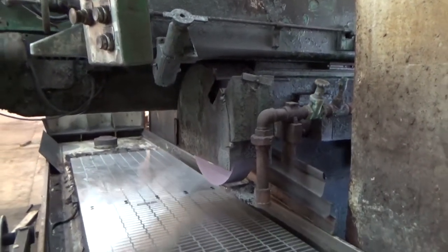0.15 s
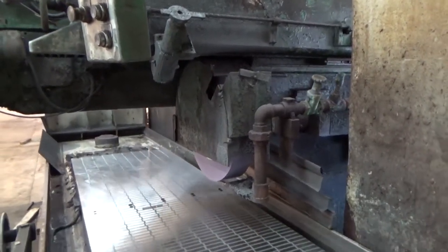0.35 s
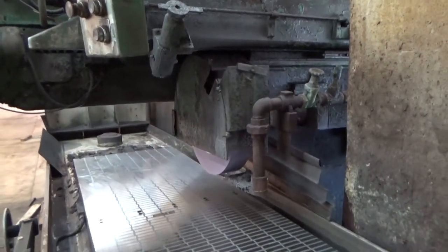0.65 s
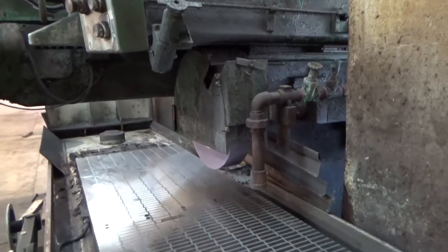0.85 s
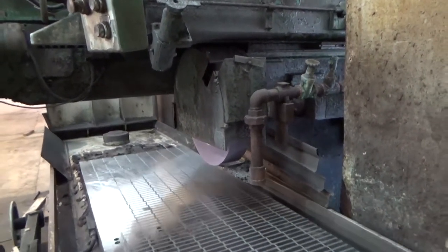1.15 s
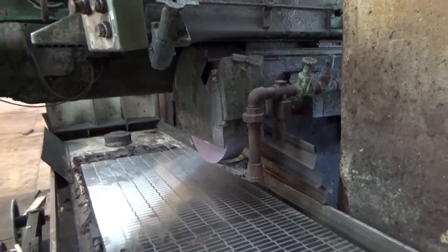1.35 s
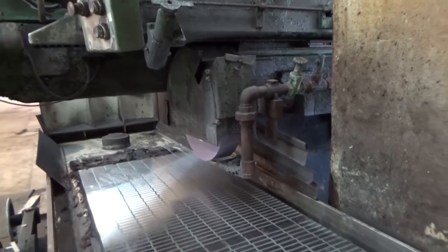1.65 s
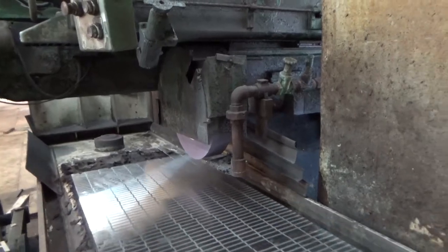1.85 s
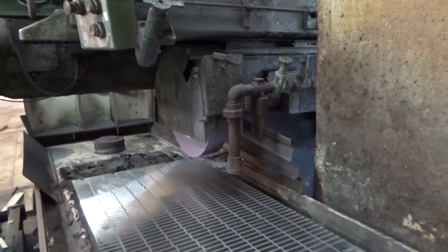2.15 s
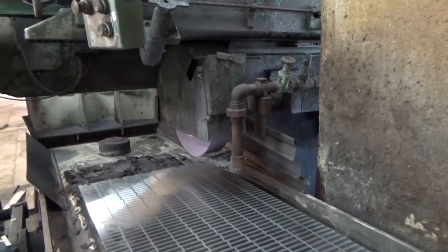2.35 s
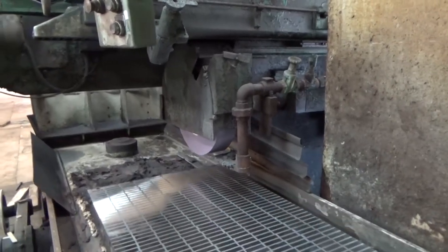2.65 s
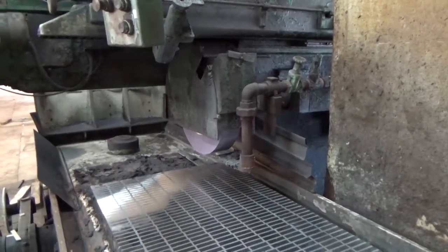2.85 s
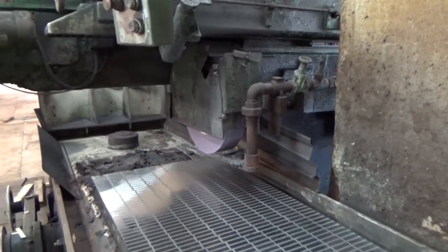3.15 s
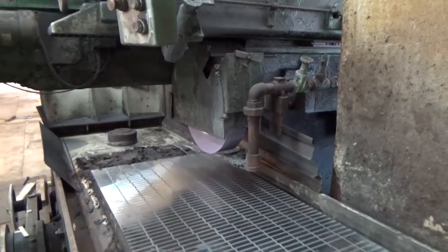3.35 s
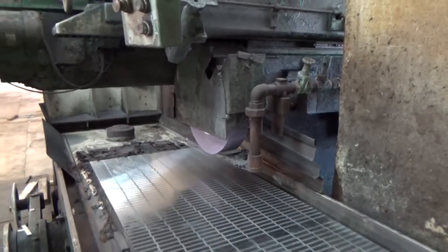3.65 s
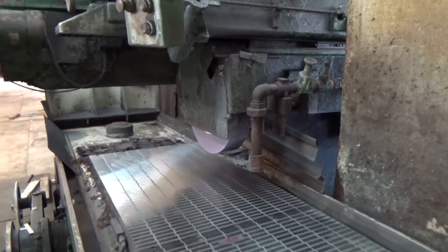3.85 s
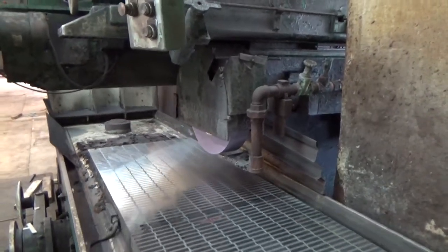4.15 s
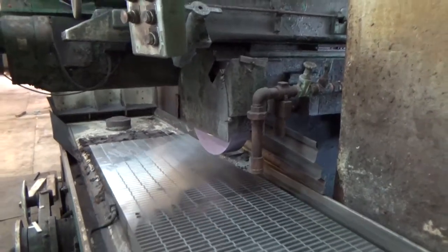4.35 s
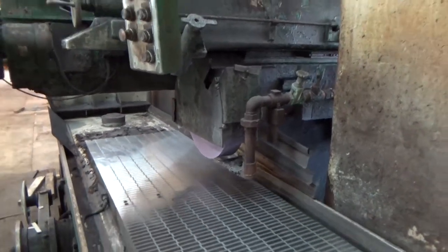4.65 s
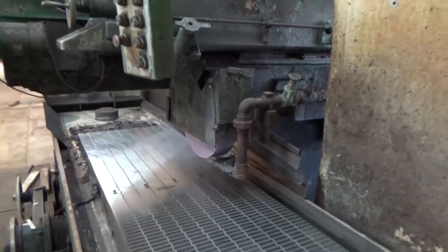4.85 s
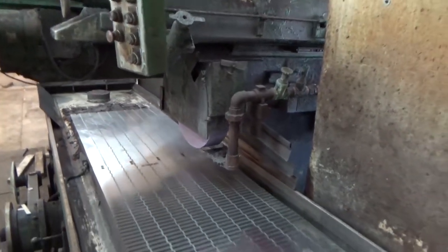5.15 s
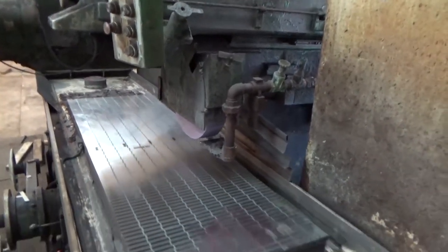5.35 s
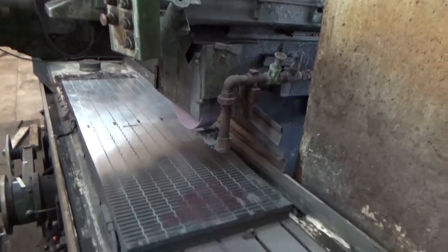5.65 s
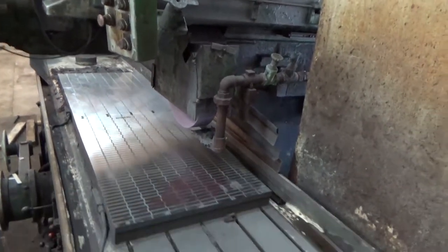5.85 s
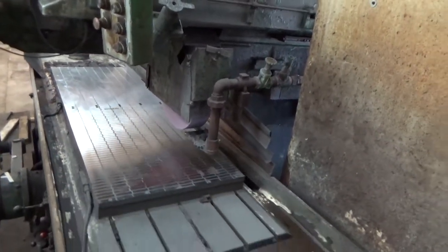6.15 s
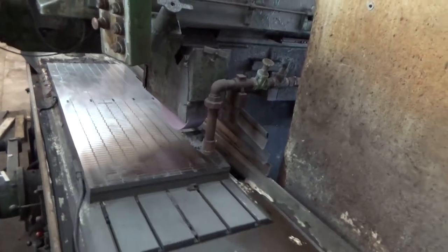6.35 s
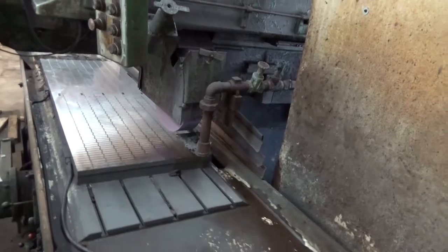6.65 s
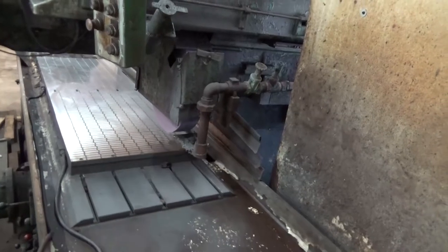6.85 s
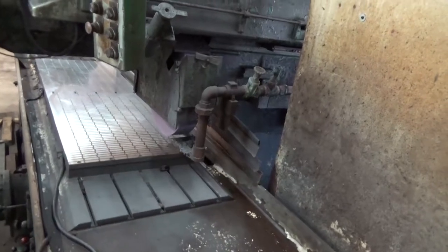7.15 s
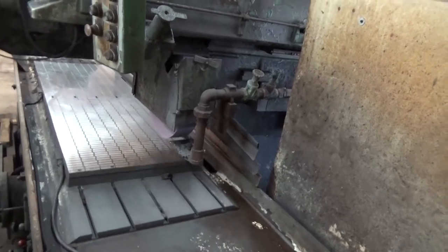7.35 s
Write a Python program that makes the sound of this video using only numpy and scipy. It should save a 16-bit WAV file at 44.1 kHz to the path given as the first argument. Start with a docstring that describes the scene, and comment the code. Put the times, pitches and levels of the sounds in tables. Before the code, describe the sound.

A large surface grinder runs throughout, about 7.5 seconds, heard close in a reverberant workshop. Its hydraulic pump gives a loud whine at about 380 Hz with dozens of overtones weakening toward the treble. Shaft wobble at roughly 29 turns per second roughens them into a dense buzz. Each overtone swells and fades independently and drifts between the ears. A wide rush of oil, air and motor lies underneath, fuller from about 0.9 to 1.3 s, with faint steady hums. A low thud comes near 0.8 s and a bright clack at 2.1 s. At 2.6 s the table reverses: the pitch rises slightly, flutters and blurs, then settles by about 3.5 s, with a duller knock at 2.9 s. The fundamental swells around 4.25 s and strongest at 6.3 s, leaning left. A faint thump at 4.8 s and sharper clack at 6.44 s precede a slightly quieter ending, with another fluttering reversal at 6.9 s.

```python
"""A large surface grinder's 13-chamber hydraulic pump whines in a workshop as its table slides past a camera.
The whine is a harmonic series, each overtone split into sidebands by the shaft's once-a-turn wobble;
the moving table and the hall make every line fade on its own. At each reversal the pump speed flutters.
Shaped noise makes the rush of oil, air and motor; thin tones hum and short noise bursts knock."""
import sys
import numpy as np
from scipy import signal
from scipy.io import wavfile
from scipy.ndimage import uniform_filter1d, minimum_filter1d

SR = 44100
rng = np.random.default_rng(int(sys.argv[2]) if len(sys.argv) > 2 else 0)


def bounce(signal):
    """Save signal as a 16-bit WAV file at the path given by the first command-line argument."""
    frames = np.transpose(np.atleast_2d(signal))
    limited = np.clip(frames, -1, 1)
    pcm = np.round(limited * 32767).astype(np.int16)
    wavfile.write(sys.argv[1], SR, pcm)


def nominal_scale(level):
    """Amplitude ratio for a level in decibels (scalar or array-like)."""
    x = np.asarray(level, float) / 20
    return 10 ** x


N = 330309


def evened(x):
    """Normalization: scales to rms 1."""
    return x / np.sqrt(np.mean(abs(x) ** 2) + 1e-20)


def read(points, hz):
    """Spectral interpolation: reads a curve on a log-frequency axis."""
    f, value = np.transpose(points)
    return np.interp(np.log(hz + 1), np.log(f + 1), value)


def follow(rows, t):
    """Linear interpolation: reads each column of a curve at times t."""
    s, *columns = np.transpose(rows)
    return np.array([np.interp(t, s, c) for c in columns])


def drift(shape, where):
    """Band-limited complex noise: about one new value for each unit of where."""
    knots = int(8 * where[-1]) + 40
    z = rng.standard_normal(shape + (4000, 2)) @ [1, 1j]
    window = np.hanning(16).reshape((1,) * len(shape) + (-1,))
    z = evened(signal.fftconvolve(z[..., :knots], window, "same", axes=-1))
    i, part = np.divmod(8 * where + 16, 1)
    i = i.astype(int)
    return z[..., i] * (1 - part) + z[..., i + 1] * part


# Strength of the overtone bunches. Each row: frequency in Hz, nominal level in dB rms.
OVERTONE_LEVELS = [(380, -12), (760, -22.5), (1140, -27), (1900, -26.5), (2660, -31.5), (3420, -33),
                   (4180, -38), (4900, -37.5), (5700, -42), (6500, -43), (7600, -46.5), (10000, -48),
                   (12000, -50.5), (14500, -54)]
# Low overtones between their swells. Each row: frequency in Hz, reference level in dB rms.
BETWEEN_LEVELS = [(380, -31.5), (760, -35.5), (1140, -34), (1520, -34.5), (2280, -41.5), (3420, -38)]
# Likeness of the two channels, also used by rush(). Each row: frequency in Hz, likeness from 0 to 1.
CHANNEL_LIKENESS = [(30, .84), (150, .86), (380, .8), (760, .9), (1200, .55), (2400, .72), (5000, .68),
                    (7500, .82), (9000, .94), (10500, .96), (10900, 1), (15000, 1)]
# Slow and brief rises and dips in the level of noise and sidebands, also used by rush().
# Each row: time in seconds, gain in dB.
LEVEL_GAIN = [(0, 0.5), (.9, 6), (1.3, 5.5), (1.42, 4), (2.3, 3.5), (2.7, 1), (2.86, 1), (3.1, 1.5),
              (3.5, 3.5), (3.6, 3), (3.8, 4), (4.3, 1.5), (4.5, 3.5), (4.7, 0.5), (5.03, 1.5), (5.12, 0.5),
              (5.8, 1), (6.4, 1.5), (6.46, 3), (6.7, -1.5), (7.49, -2.5)]
CHAMBERS, TOP_OVERTONE = 13, 38
SPREAD, STEP = 6, 16  # shaft orders kept on each side; samples between slow values


def whine(wobble=0.12, twice=0.029, side_db=-1.0, flutter_hz=1.158, smear_hz=7, shaken_db=3,
          lopsided=0.021, fade_hz=1.2, steady=0.28):
    """Phase modulation: shaft wobble splits each overtone into orders, which fade by multipath."""
    t, fine = np.arange(0, N + STEP, STEP) / SR, np.arange(N) / SR
    unrest, rate_hz = reversing(t)
    rate_hz = rate_hz + flutter_hz * unrest * drift((), 14 * t).real
    turns = np.cumsum(np.interp(fine, t, rate_hz)) / SR  # counted in chambers
    offsets = np.arange(-SPREAD, SPREAD + 1)
    shaft = np.exp(2j * np.pi * offsets[:, None] * np.interp(t, fine, turns) / CHAMBERS)
    angle = 2 * np.pi * np.arange(64) / 64
    swing = wobble * np.sin(angle) + twice * np.sin(2 * angle + 1.25)  # radians at overtone 1
    level_gain_db = follow(LEVEL_GAIN, t)[0]
    chamber, carrier, out = np.exp(2j * np.pi * turns), 1, np.zeros((2, N))
    for k in range(1, TOP_OVERTONE + 1):
        carrier, hz = carrier * chamber, k * rate_hz.mean()
        # the Fourier series of one turn gives the sidebands
        one_turn = np.exp(1j * k * swing) * (1 - lopsided * np.cos(angle))
        sizes = np.fft.fft(one_turn)[offsets] / len(angle) * nominal_scale(side_db * (offsets != 0))

        # paths change faster for short waves and when the speed is uneasy
        path_rate = fade_hz * k ** .4 * (1 + (k / 22) ** 4) + smear_hz * (k + 2) * unrest ** 2
        travelled = np.minimum(np.cumsum(path_rate) * STEP / SR, 480)
        left, other = drift((2, len(offsets)), travelled)
        same = np.clip(read(CHANNEL_LIKENESS, hz), -1, 1)
        right = same * left + np.sqrt(1 - same ** 2) * other
        direct = steady * np.exp(2j * np.pi * rng.random((len(offsets), 1)))
        paths = (direct + np.array([left, right])) / np.hypot(1, steady)
        order_db = level_gain_db + shaken_db * unrest * (offsets != 0)[:, None]
        orders = paths * (sizes * nominal_scale(read(OVERTONE_LEVELS, hz)))[:, None] * nominal_scale(order_db)

        heard = swells(k, t)
        if hz < 1.05 * BETWEEN_LEVELS[-1][0]:
            between = nominal_scale(read(BETWEEN_LEVELS, hz))
            orders[:, SPREAD] = between * min(0.24 * k, .9) * paths[:, SPREAD]
            heard = heard + between
        # the hall still holds the pitch of a moment ago
        share = min(0.19 + 0.16 * k, .95) * unrest + 0.027 * k
        shaken = np.exp(1.8j * share * left[SPREAD].real) * (1 + 0.68 * share * left[SPREAD].imag)
        # one microphone hears it a little early
        lag = -.35 / k if k < 3 else 0.61 * other[SPREAD].real
        lead = 1 + 1j * np.array([[1], [-1]]) * lag
        phase = 2 * np.pi * rng.random() + 0.8 * drift((), 0.64 * t).real
        orders[:, SPREAD] += heard * cancelled(k, t) * shaken * np.exp(1j * phase) * lead

        for ear, slow in zip(out, (orders * shaft).sum(1)):
            ear += np.sqrt(2) * (np.interp(fine, t, slow) * carrier).real
    return out, turns


# Relative colour of the noise. Each row: frequency in Hz, density in dB per Hz.
NOISE_COLOUR = [(20, -18), (38, -13), (60, -15), (100, -7.5), (165, 2), (450, 1.5), (900, -2), (1400, -3),
                (2500, -4.5), (4000, -7), (7000, -11.5), (8800, -22.5), (10500, -11), (13500, -22),
                (15700, -22.5)]
# Stereo balance of the noise. Each row: frequency in Hz, left minus right in dB.
NOISE_BALANCE = [(30, 3.5), (60, 5), (240, 2.5), (950, -.4), (3800, -.5), (8000, 0)]
HISS_DB, RUMBLE_SWAY_DB = -9.5, 1.2


def rush(turns, patchy_db=1.5, swell_db=2.0, churn_db=3, pulse=0.23, turn=0.27):
    """Amplitude-modulated noise of oil, air and motor: chamber and shaft turn throb in the treble."""
    frames, hz = N // 256 + 5, np.fft.rfftfreq(1024, 1 / SR)
    a, b, c, d, patches = rng.standard_normal((frames, 513, 5)).T
    patches = evened(uniform_filter1d(uniform_filter1d(patches, 14, 0), 12, 1))
    same = np.clip(read(CHANNEL_LIKENESS, hz), 0, 1)[:, None] ** 1.06
    left = a + 1j * b
    z = np.array([left, same * left + np.sqrt(1 - same ** 2) * (c + 1j * d)])
    balance_db = np.multiply.outer([.5, -.5], read(NOISE_BALANCE, hz))
    z *= nominal_scale(balance_db + read(NOISE_COLOUR, hz))[..., None]
    z /= np.sqrt(np.mean(abs(z[:, hz > 8000]) ** 2) * np.mean(hz > 8000))  # treble sets the level
    t = np.arange(frames) * 256 / SR
    # oil churns in the reversing valve
    churn = np.exp(-np.log(hz[:, None] / 2500 + 1e-3) ** 2) * reversing(t)[0]
    rumble_db = (hz[:, None] < 130) * RUMBLE_SWAY_DB * drift((), 3 * t).real
    level_db = follow(LEVEL_GAIN, t) + rumble_db
    moving_db = patchy_db * patches + swell_db * drift((), 7 * t).real + churn_db * churn
    z *= nominal_scale(moving_db + level_db + HISS_DB)
    low, high = (signal.istft(z * part[:, None], nperseg=1024, noverlap=768)[1][:, :N] / 512
                 for part in (hz < 2500, hz >= 2500))
    chamber_throb = 1 + pulse * np.cos(2 * np.pi * turns)
    shaft_throb = 1 + turn * np.cos(2 * np.pi * turns / CHAMBERS)
    return low + high * chamber_throb * shaft_throb


# Faint tones of other rotating parts. Each row: frequency in Hz, mean amplitude in dB.
HUM_TONES = [(100, -71), (660, -43), (1360, -43.5), (1478, -44), (2110, -44.5)]


def hums():
    """Narrow-band modulation: sinusoids waver slowly in strength and phase."""
    t = np.arange(N) / SR
    waver = drift((len(HUM_TONES),), 2.57 * t)
    return sum(nominal_scale(db) * ((1 + 0.13 * w) * np.exp(2j * np.pi * hz * t)).real
               for (hz, db), w in zip(HUM_TONES, waver))


# An overtone swells as its paths through the hall fall in step. Each row: centre in seconds, overtone
# in Hz, nominal peak in dB, half length to 1/e in seconds, lean in dB (positive is left, softly limited).
PATH_SWELLS = [(0.04, 1140, -35, 0.089, -17), (0.078, 1900, -32, 0.16, -17), (0.13, 380, -16.5, 0.39, 0),
               (0.163, 4940, -35, 0.18, 0.5), (0.246, 760, -26.8, 1, 6), (0.244, 1520, -27, 0.96, -3.4),
               (0.444, 2280, -32, 0.48, 1), (0.524, 3420, -35.5, 0.68, 5), (0.64, 1140, -25.5, 0.16, -9),
               (0.64, 3040, -33, 0.066, 0), (0.834, 380, -18.5, 0.21, -9), (0.877, 760, -26, 0.19, 4.1),
               (0.875, 1140, -27.5, 0.98, 4), (0.927, 2660, -29, 0.51, 0), (1, 6460, -40, 0.33, 0),
               (1.054, 1900, -21.5, 0.44, -1), (1.205, 4560, -36, 0.35, 2), (1.233, 380, -24.9, 0.3, 23.5),
               (1.24, 4940, -40, 0.33, -15), (1.254, 1140, -28, 0.14, -7), (1.636, 760, -21, 0.72, -2.5),
               (1.653, 1520, -30, 0.25, 23), (1.64, 3040, -35, 1, 19), (1.884, 3420, -38, 0.21, 0.2),
               (2.0, 6460, -47, 0.84, 1), (2.033, 380, -22, 0.41, 1), (2.05, 1140, -32, 0.21, -10),
               (2.115, 2660, -32, 0.38, -4.0), (2.316, 760, -24, 0.35, 4), (2.404, 2280, -34.5, 0.24, -14),
               (2.596, 1520, -25.3, 0.18, -2), (2.71, 380, -19, 0.08, -4), (2.736, 1900, -33.5, 0.27, 0),
               (2.893, 1520, -26.5, 0.056, -11), (2.938, 380, -20.5, 0.17, 6), (2.978, 760, -27, 0.13, -9),
               (3.104, 1520, -25.5, 0.08, -10), (3.078, 2280, -31.5, 0.34, 1.3),
               (3.136, 1900, -26, 0.056, -7), (3.182, 1900, -21.5, 0.32, -3), (3.233, 380, -22.5, 0.18, -2),
               (3.304, 2660, -39, 0.2, 0), (3.314, 1520, -23, 0.043, 3), (3.535, 3040, -37, 0.18, 1),
               (3.607, 1520, -25, 0.16, 4), (3.59, 4560, -35.5, 0.66, -5), (3.64, 6460, -37, 0.47, -6.3),
               (3.734, 380, -24, 0.15, 15), (3.746, 3420, -42, 0.28, -2), (3.756, 2280, -31.5, 0.22, 7.0),
               (3.8, 760, -24, 0.81, -6.5), (4.003, 1520, -29, 0.08, -9), (4.126, 1900, -25, 0.38, 1),
               (4.253, 380, -15.5, 0.39, 3.3), (4.274, 1520, -29, 0.08, 10), (4.28, 3040, -40, 0.59, 4),
               (4.453, 2660, -31, 0.041, -5), (4.516, 760, -25, 0.64, 0), (4.55, 6460, -37.5, 0.11, -18),
               (4.588, 1520, -28.5, 0.097, -8), (4.92, 1140, -27.5, 0.28, 1),
               (4.966, 1900, -31.5, 0.41, -11), (4.986, 380, -25, 0.31, 3), (5.016, 1520, -30, 0.14, 13),
               (5.12, 2660, -44, 0.39, -46), (5.283, 760, -25, 0.41, 3), (5.4, 3040, -35, 0.36, -2.1),
               (5.525, 3420, -42, 0.31, -5), (5.56, 6460, -48, 0.18, -7.1), (5.64, 1140, -25.5, 0.08, 4),
               (5.8, 380, -19, 0.36, 11), (5.798, 2280, -26.5, 0.56, 0.9), (5.846, 1520, -30.5, 0.19, 0),
               (5.95, 380, -39, 0.019, 1), (5.978, 1140, -31.5, 0.071, 4), (6.12, 760, -24.5, 0.59, -2.5),
               (6.237, 1520, -32, 0.13, 9), (6.248, 2660, -38, 0.57, -6.1), (6.286, 1900, -29.5, 0.29, 7.7),
               (6.302, 380, -8, 0.24, 11.5), (6.577, 3040, -44, 0.36, -12), (6.645, 1520, -33, 0.066, 8),
               (6.72, 380, -30, 0.21, 19), (6.85, 2280, -36.5, 0.2, 2), (6.89, 1900, -33, 0.28, 1),
               (6.906, 760, -32.5, 0.07, -9), (7.073, 380, -26, 0.097, 5.7), (7.08, 1140, -37.5, 0.71, -26),
               (7.09, 3040, -46, 0.039, 0), (7.317, 1520, -22.5, 0.083, -18), (7.363, 760, -33, 0.21, -6),
               (7.36, 2280, -33, 0.093, -10), (7.44, 1900, -32, 0.21, -1.2)]


def swells(k, t):
    """Constructive interference: Gaussian left and right strength of the swells of overtone k."""
    rows = [row for row in PATH_SWELLS if round(row[1] / RUN_HZ) == k]
    sides = np.array([[1], [-1]])
    return sum(nominal_scale(db) * (1.5 + np.tanh(lean_db / 17) * sides) * np.exp(-((t - s) / half) ** 2)
               for s, hz, db, half, lean_db in rows)


# Knocks in the machine. Each row: start in seconds, level in dB before the common 5 dB cut,
# centre in Hz, time to decay by 60 dB in seconds.
MACHINE_KNOCKS = [(.8, -19, 160, .15), (2.114, -14, 2190, 0.18), (2.115, -18, 10000, .06),
                  (2.9, -15, 400, 0.56), (4.841, -25, 151, 0.172), (6.439, -25, 300, 0.22),
                  (6.44, -19, 1494, 0.23), (6.44, -18, 8500, .04)]


def knocks():
    """Exponential decay: impacts as dying noise bursts, each about an octave wide."""
    out, t = np.zeros((2, N + SR)), np.arange(SR // 2) / SR
    for s, db, hz, t60 in MACHINE_KNOCKS:
        edges_hz = [.7 * hz, min(1.4 * hz, SR / 2 - 100)]
        band = signal.butter(2, edges_hz, "band", fs=SR, output="sos")
        noise = np.array([[1, 0.34], [1, -.4]]) @ rng.standard_normal((2, len(t)))  # partly alike
        burst = evened(signal.sosfilt(band, noise)) * nominal_scale(db - 5.0 - 60 * t / t60)
        attack = np.minimum(t * hz / 2, 1)  # two periods long
        out[:, round(s * SR):][:, :len(t)] += burst * attack
    return out[:, :N]


# The table brakes and turns round, also used by cancelled(). Each row: start in seconds, strength 0 to 1.
TABLE_REVERSALS = [(2.58, .9), (6.928, .85)]
RISE_S, HOLD_S, SETTLE_S, IDLE_UNREST = 0.0881, .3, .4, 0.0395
# the relieved pump speeds up and hunts
RUN_HZ, UNLOADED_HZ, HUNT_HZ, HUNT_DEPTH = 380.08, 4.2, 6.85, 0.18


def reversing(t):
    """Load relief: unrest (0-1) and chamber rate rise fast at each reversal, hold, then settle."""
    unrest, rate_hz = IDLE_UNREST, RUN_HZ
    for s, strength in TABLE_REVERSALS:
        since = t - s
        settle = np.exp(-np.maximum(since - RISE_S - HOLD_S, 0) / SETTLE_S)
        shape = strength * np.clip(since / RISE_S, 0, 1) * settle
        unrest = unrest + shape
        hunting = 1 + HUNT_DEPTH * np.cos(2 * np.pi * HUNT_HZ * (since - .13))
        rate_hz = rate_hz + UNLOADED_HZ * shape * hunting
    return np.clip(unrest, 0, 1), rate_hz


# as the pitch jumps, the old tone in the hall cancels the new one; overtone 2 dips later and longer
CANCEL, CANCEL_STEP_S, CANCEL_HALF_S = 0.9, 0.086, 0.031


def cancelled(k, t):
    """Destructive interference: share of overtone k left near each reversal; only the lowest two dip."""
    half_s = CANCEL_HALF_S * k ** .5
    dips = sum(np.exp(-((t - s - CANCEL_STEP_S * (k - 1)) / half_s) ** 2) for s, _ in TABLE_REVERSALS)
    return 1 - CANCEL * dips * (k < 3)


def scene():
    """Superposition: pump, noise, hums and knocks add."""
    pump, turns = whine()
    return pump + rush(turns) + hums() + knocks()


KNEE_DB, RATIO = -5.5, 3.42
GRIP_S, EASE_S = 0.12, 0.02  # peak window and smoothing window


def gain_control(x):
    """Compression: turns everything down while peaks of the louder microphone pass the knee."""
    peak = -minimum_filter1d(-abs(x).max(0), round(GRIP_S * SR))
    over_db = np.maximum(20 * np.log10(peak + 1e-9) - KNEE_DB, 0)
    cut_db = uniform_filter1d(over_db, round(EASE_S * SR)) * (1 - 1 / RATIO)
    return x * nominal_scale(-cut_db)


def top_cut(x):
    """Nothing passes above the cut-off."""
    return signal.sosfilt(signal.butter(12, 15700, fs=SR, output="sos"), x)


def record(dry):
    """Soft saturation: after gain control, loud peaks round off slightly."""
    rounded = 1.576 * np.tanh(gain_control(dry) / 1.407)
    return top_cut(rounded)


dry = scene()
out = record(dry)
bounce(out)
```